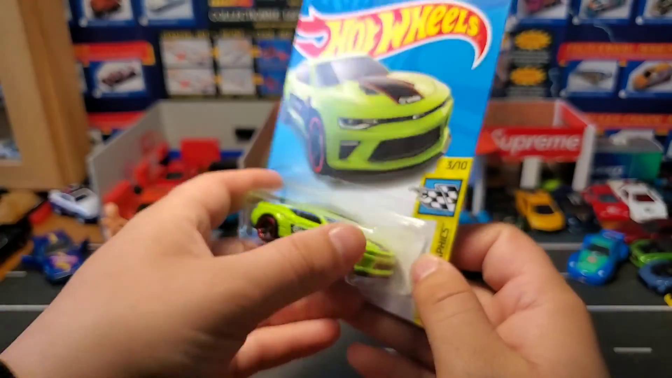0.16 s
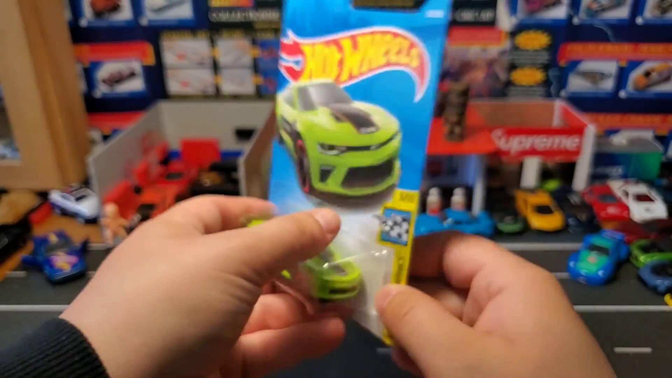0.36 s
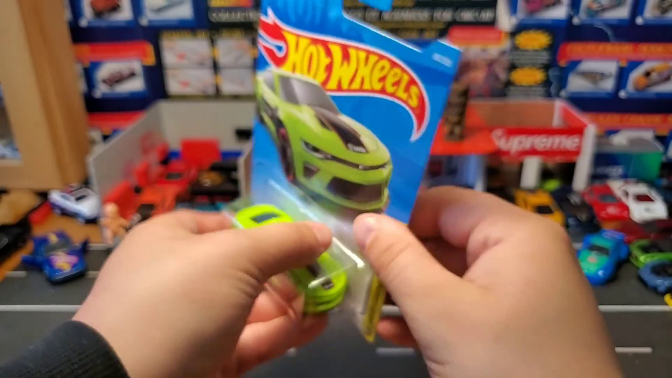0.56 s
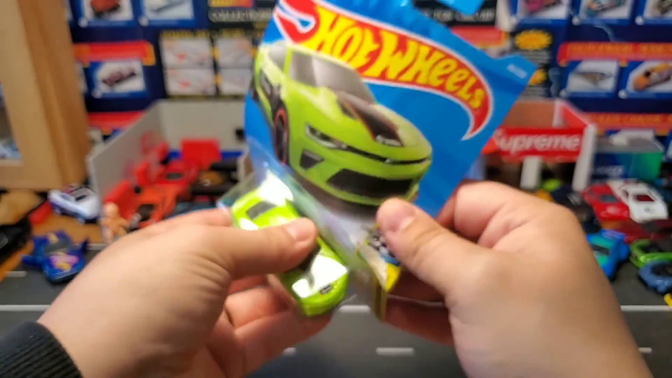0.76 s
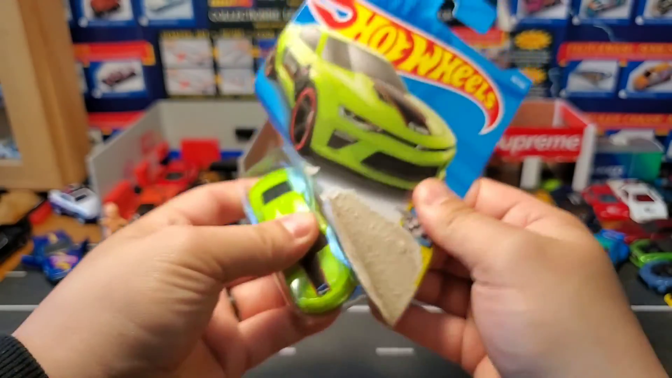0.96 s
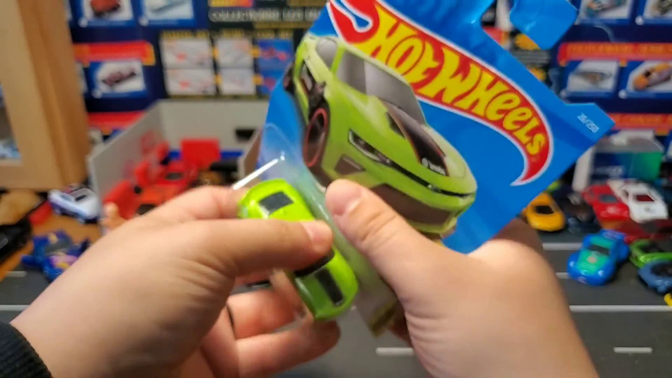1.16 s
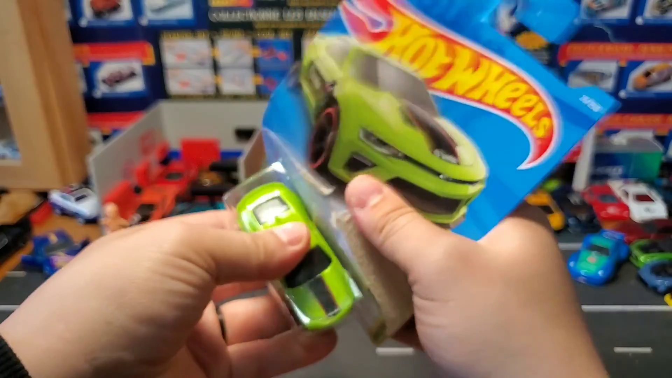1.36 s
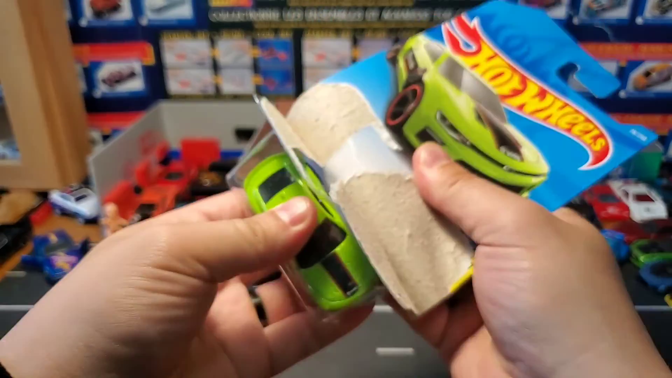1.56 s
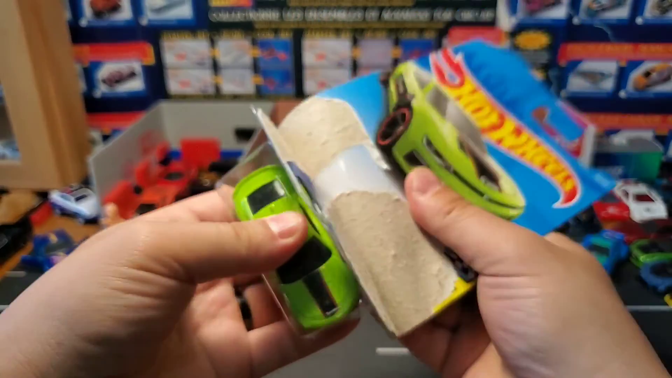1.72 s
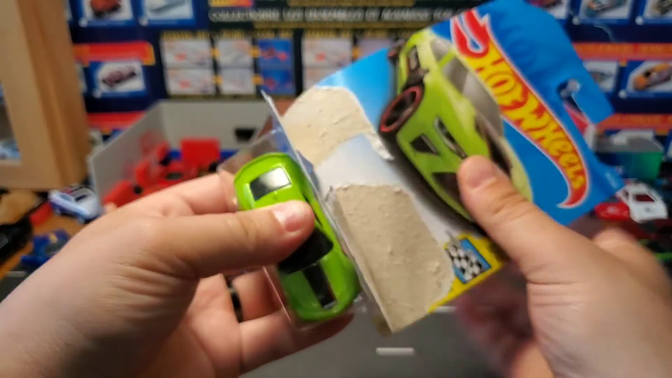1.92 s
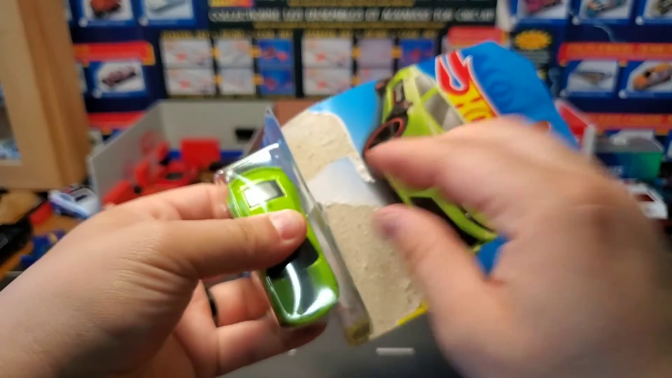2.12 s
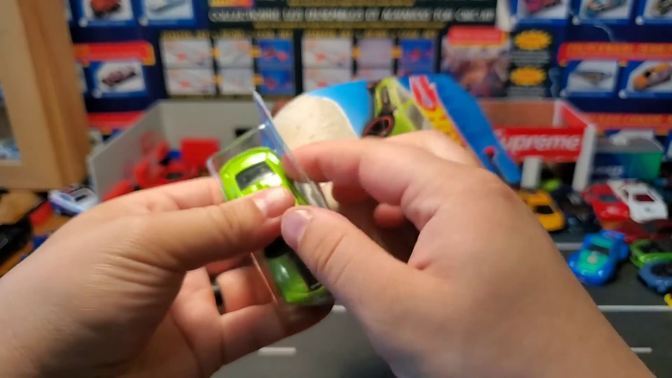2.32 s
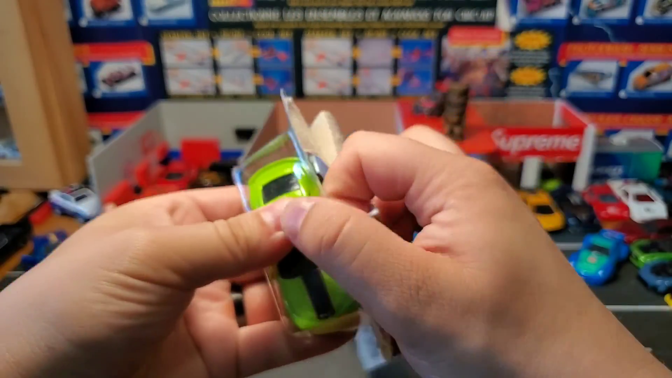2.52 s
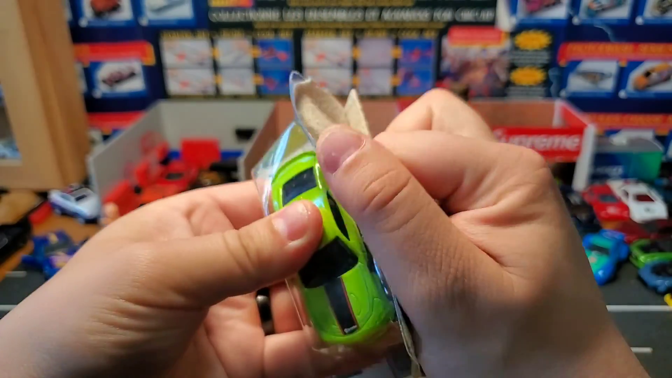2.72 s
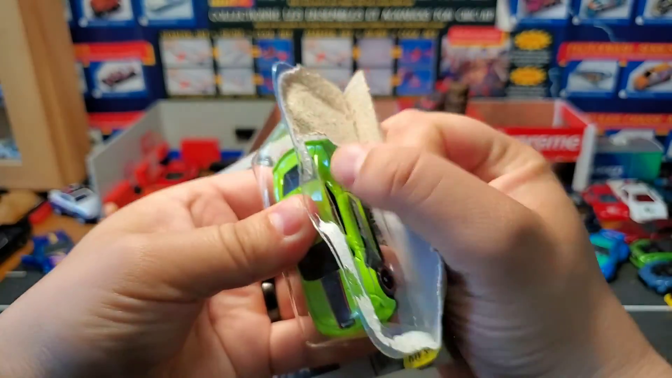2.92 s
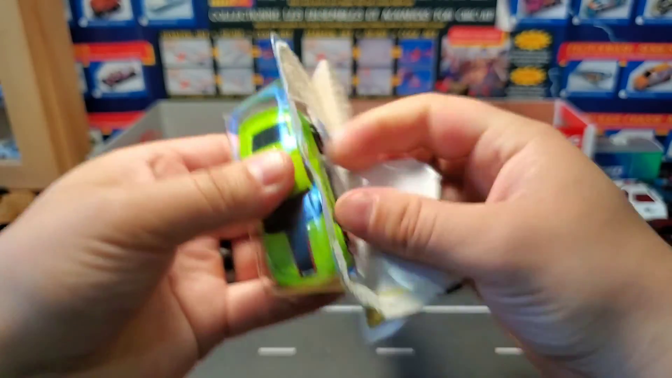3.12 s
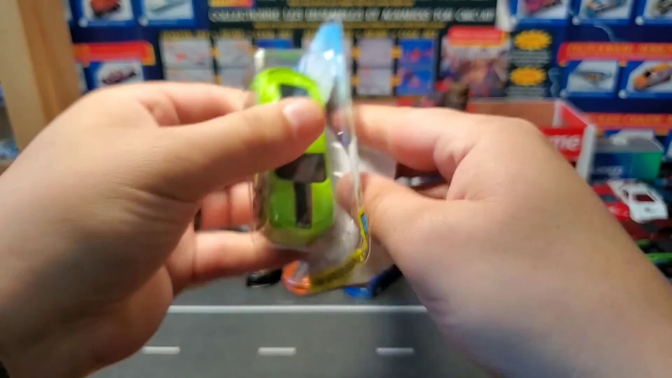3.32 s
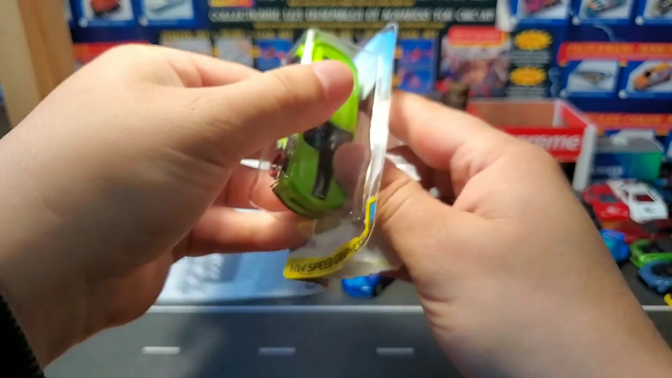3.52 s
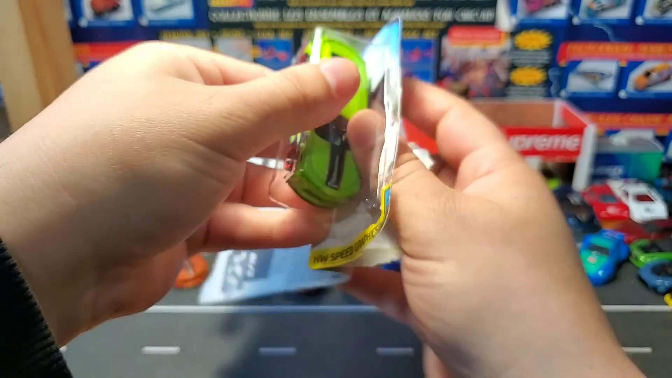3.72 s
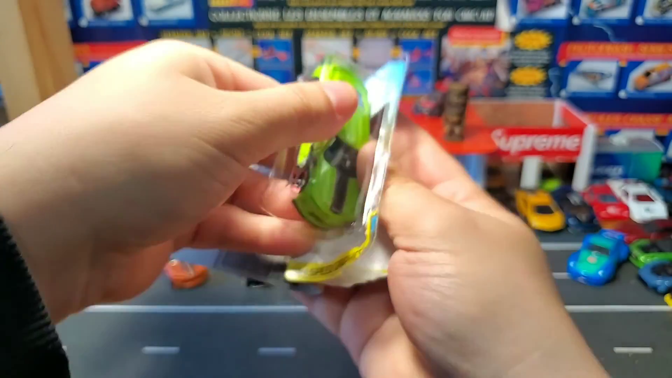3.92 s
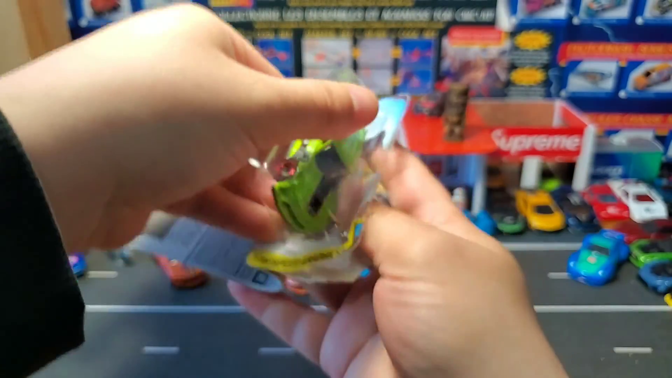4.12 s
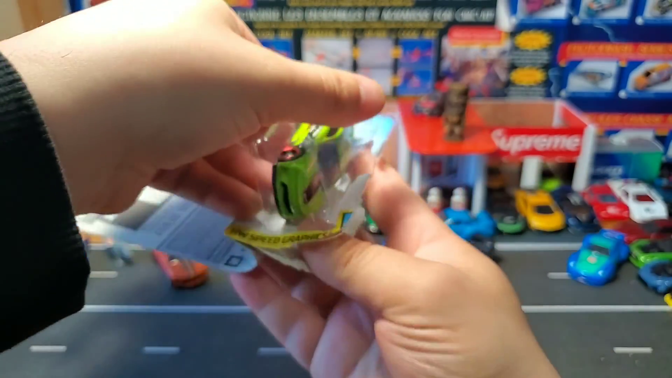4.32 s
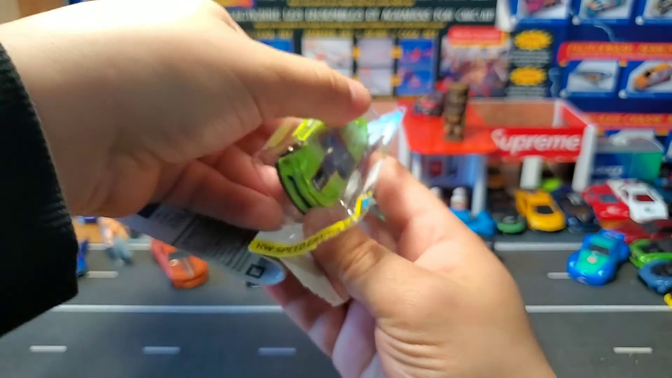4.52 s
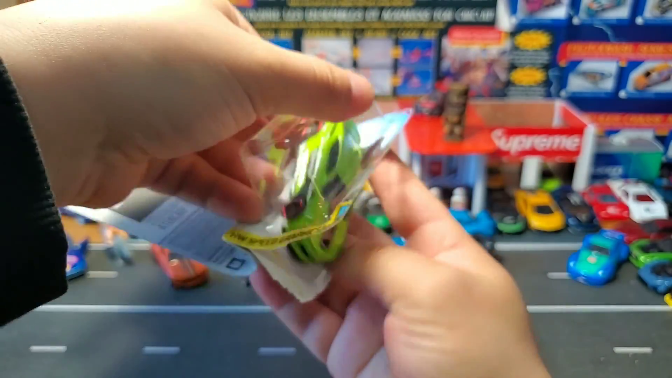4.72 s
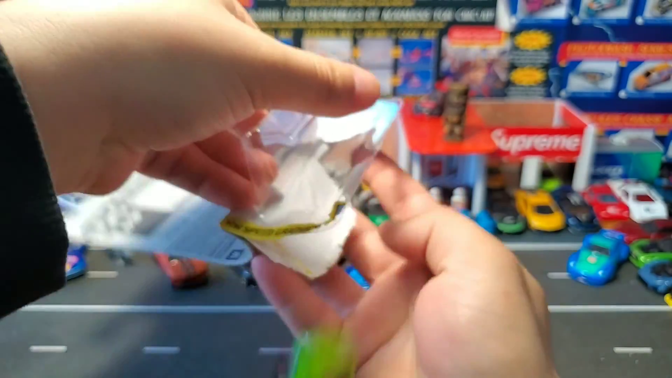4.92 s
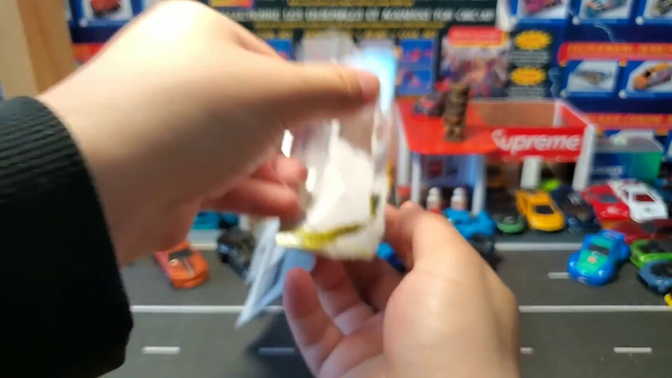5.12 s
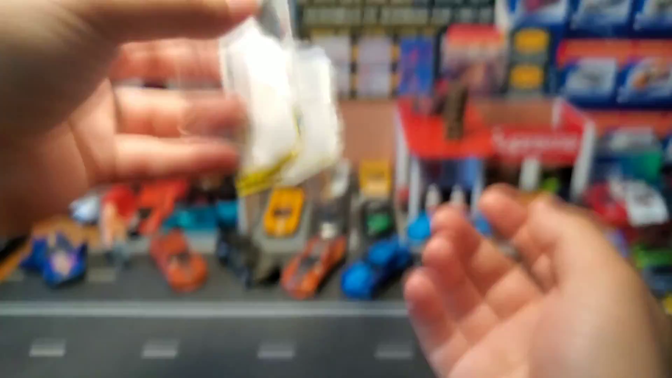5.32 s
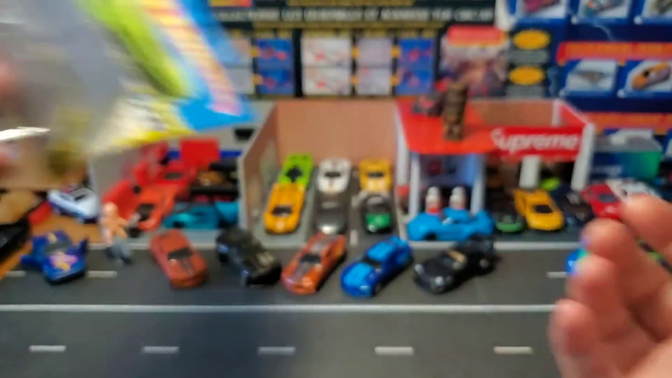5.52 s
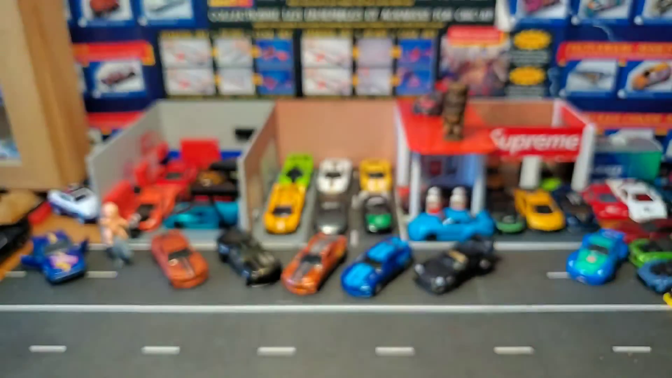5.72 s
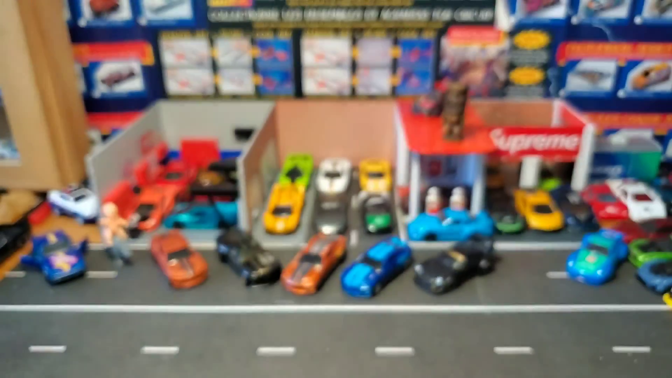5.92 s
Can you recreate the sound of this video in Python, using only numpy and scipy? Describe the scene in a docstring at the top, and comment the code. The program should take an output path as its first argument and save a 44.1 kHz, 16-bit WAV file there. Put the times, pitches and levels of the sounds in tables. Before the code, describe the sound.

Hands peel a plastic blister from its cardboard with sharp crackles and rips, then the pack and a small metal toy land on a table.

```python
"""Peeling open a blister pack

Close on a stereo pair in a small, quiet room, the hands a little to the right. The plastic shell snaps
and crinkles as it buckles; the card rustles under the fingers and rips fibre by fibre.
Around five seconds in, a metal toy clinks, then pack and toy land and set the table top ringing."""
import sys
import numpy as np
from scipy import signal
from scipy.fft import rfft, irfft
from scipy.io import wavfile

SR = 44100
rng = np.random.default_rng(int(sys.argv[2]) if len(sys.argv) > 2 else 0)


def store_wav(level_fs):
    """Save 16-bit WAV to argv[1]."""
    pcm = np.round(np.clip(np.atleast_2d(level_fs), -1, 1) * 32767)
    wavfile.write(sys.argv[1], SR, pcm.T.astype(np.int16))


N = 263012

# Room tone and microphone hiss: freq_hz, relative_db
AIR_SPECTRUM = [(18, -56.5), (30, -16.5), (79, 19.5), (109, -40), (486, -37), (1070, -26.5),
                (2060, -17.5), (2900, -53.5), (6550, -36.5), (16000, -32)]
# Fingers rubbing and holding the card: time_s, body_db, hiss_db, rumble_db
HANDLING = [(0.0, -91, -84, -61.5), (0.301, -64.5, -74.5, -63), (0.5, -56, -53, -56),
            (0.8, -55, -69, -62.5), (1.079, -57.5, -53.5, -68), (1.35, -59, -61, -55),
            (1.621, -60, -67, -64), (1.92, -58, -48.5, -68.5), (2.099, -89.5, -87, -71),
            (2.27, -75, -91, -63), (2.359, -51.5, -66, -60), (2.5, -48, -48.5, -62),
            (2.8, -45.5, -45.5, -55), (3.05, -53.5, -51.5, -70), (3.3, -50.5, -50.5, -54),
            (3.5, -56, -59.5, -63), (3.849, -51.5, -50.5, -62), (4.12, -55.5, -54, -66),
            (4.4, -62.5, -65, -65), (4.55, -55, -46, -68), (4.95, -49, -88, -56), (5.05, -58, -60, -61),
            (5.3, -53.5, -78, -46), (5.56, -66.5, -72, -58), (5.78, -72, -61.5, -62), (5.96, -52, -67, -43)]
# Hard pulls that rip the card: start_s, length_s, body_db, hiss_db, fizz_db, rumble_db
RIP_PULLS = [(0.13, .09, -49.5, -52.5, -53, -51), (0.505, 0.055, -54, -52.5, -45.5, -58),
             (0.835, .03, -42.5, -35, -37, -55), (0.897, 0.095, -38.5, -43, -38, -47.5),
             (1.236, .07, -41.5, -43, -51, -53), (1.385, 0.054, -35, -39, -44.5, -50.5),
             (1.455, 0.023, -34.5, -41.5, -42, -50), (1.488, 0.043, -30, -40.5, -37, -49.5),
             (1.624, .04, -55, -55, -47, -73), (1.96, 0.037, -36, -47, -44, -50),
             (2.548, .1, -41, -49, -41, -63), (2.72, .06, -41.5, -43, -40, -59),
             (2.857, 0.093, -39, -43, -45, -58), (3.077, .07, -43.5, -40, -35, -58),
             (3.851, .05, -50.5, -56, -57, -55), (4.718, .17, -42, -47.5, -44.5, -72),
             (5.326, .05, -39.5, -31.5, -44, -40)]
# Broad resonances of the card: centre_hz, width_hz, relative_db
CARD_MODES = [(480, 244, -1), (803, 330, 4), (1297, 610, 4), (1893, 270, 5), (2610, 860, -1)]
# Hiss of the fibres: freq_hz, relative_db
HISS_SPECTRUM = [(2500, -59.5), (3500, 2), (5000, 1.5), (6700, 2.5), (7600, -4), (9000, -23.5)]
# Their finest fizz: freq_hz, relative_db
FIZZ_SPECTRUM = [(6500, -39.5), (8000, 4.5), (11000, 3), (15000, 9), (16500, -7.5)]
# Rumble of the hands: freq_hz, relative_db
RUMBLE_SPECTRUM = [(30, -18), (60, 11), (110, 0.5), (200, -7.5), (400, -12), (700, -32)]
# The shell's louder snaps (top is the crack above 7 kHz, pan is left minus right):
# start_s, ring_db, pitch_hz, ring_ms, crack_db, crack_hz, top_db, thump_db, pan_db
SHELL_SNAPS = [(0.066, -71.5, 514, 2.1, -61, 3180, -69, -72, -6),
               (0.103, -45, 1210, 4.7, -52, 2870, -68, -57, -5),
               (0.142, -24, 1900, 5.9, -39.5, 3290, -51, -38, -7),
               (0.159, -22.5, 1180, 1.2, -41.5, 2570, -45, -41.5, -6),
               (0.199, -24, 1810, 2.4, -46, 2460, -37, -44, -5),
               (0.53, -32, 1440, 3.3, -50, 5700, -45.5, -53, -7),
               (0.606, -32, 840, 1.2, -42, 2720, -54, -43, -6.0),
               (0.627, -29, 874, 2.4, -43, 3300, -46, -50, -7),
               (0.687, -42, 822, 2.4, -37, 6670, -37.5, -57, -7),
               (0.707, -36, 1360, 2.1, -31, 6860, -31, -57, -8),
               (0.712, -19.5, 1500, 2.5, -33.5, 2400, -42.5, -49, -3.5),
               (0.723, -35, 2400, 2.9, -43, 4780, -28.5, -48.5, -2.5),
               (0.728, -36, 1480, 2.4, -39.5, 7000, -38, -56, -6),
               (0.749, -50, 1110, 2.4, -46, 6500, -43, -57, -18),
               (0.779, -34, 1090, 1.9, -68, 2770, -55, -54.5, -14),
               (0.805, -37.5, 1420, 2.4, -46.5, 6140, -47, -62, -7),
               (0.815, -34, 1370, 3.1, -39.5, 3600, -31, -51, -3.5),
               (0.856, -13, 2110, 3.4, -28.5, 3030, -11.5, -43.5, -4),
               (0.863, -19, 1380, 4.6, -22, 5340, -25.5, -50.5, -3.5),
               (0.907, -19, 1220, 4.4, -25, 6830, -24, -54, -3.5),
               (0.913, -29.5, 1100, 5.3, -28, 2700, -13.5, -42.5, -4.5),
               (0.933, -10.5, 1984, 2.6, -25, 3100, -27, -33, -4.5),
               (0.958, -15, 866, 2.1, -23, 3130, -29, -32.5, -4.5),
               (0.985, -22.5, 1570, 3.9, -31, 3870, -26.5, -33.5, -4),
               (1.092, -14, 1345, 2.2, -62, 2540, -49, -31.5, -8.5),
               (1.113, -32.5, 799, 2.7, -51, 4060, -39, -52.5, -2),
               (1.136, -34, 2030, 2.4, -55, 2500, -34, -55.5, -4),
               (1.163, 1, 1328, 4.4, -45, 3100, -31, -45.5, -7.0),
               (1.238, -18.5, 1910, 1.8, -14, 2330, -19, -47.5, -7.5),
               (1.366, -19, 1870, 2.1, -61, 3210, -55, -68, -3),
               (1.379, -14.5, 1400, 2.7, -28.5, 5800, -41, -43.5, -5),
               (1.393, -10, 1420, 2.4, -21.5, 2800, -18.5, -40, -6),
               (1.401, -12.5, 1280, 2.2, -20, 3043, -17.5, -34.5, -2.5),
               (1.47, -18.5, 854, 1.1, -36, 3220, -25.5, -51, -3.5),
               (1.485, -16.5, 1680, 3.1, -30.5, 2700, -18, -32, -5),
               (1.5, -16, 1385, 7.2, -27, 2590, -25, -30, -7),
               (1.516, -18.5, 1150, 5.5, -26.5, 2710, -21, -40, -3),
               (1.621, -30.5, 1400, 1.6, -48, 7100, -22.5, -50.5, -7),
               (1.636, -24, 1270, 1.9, -29.5, 5370, -18, -51.5, -6.5),
               (1.736, 0.5, 1440, 2.8, -17, 2700, -20.5, -55.5, -5.5),
               (1.758, -44.5, 1480, 2.4, -51, 2500, -31, -42.5, 0),
               (1.815, -17.5, 1431, 3.4, -34.5, 3130, -40.5, -34, -6),
               (1.832, -18.5, 1920, 4.8, -35.5, 2750, -29.5, -36, -3.5),
               (1.921, -15, 1305, 0.97, -25.5, 2600, -48, -35.5, -3.5),
               (1.972, 0.5, 1920, 2.8, -36, 2970, -18.5, -27, -4.5),
               (2.241, -34.5, 1167, 3, -80, 2870, -79, -42.5, -5.5),
               (2.29, -39, 800, 2.9, -48.5, 3070, -51, -37, -5),
               (2.312, -44, 802, 1.2, -43, 2800, -36.5, -43, -4),
               (2.378, -27, 1827, 1.8, -51.5, 2970, -50, -47, -3),
               (2.456, -12.5, 1970, 1.14, -31.5, 3900, -30, -52, -5.5),
               (2.497, -33.5, 1540, 2.9, -47, 6030, -34.5, -51, -2.5),
               (2.549, -24, 1505, 1.1, -39, 3480, -42, -56, -3),
               (2.596, -23.5, 1840, 1.6, -39.5, 4170, -32, -67, -2.5),
               (2.622, -24, 2090, 2.7, -36, 5856, -26.5, -60.5, -4.5),
               (2.654, -25.5, 2100, 2.2, -44, 2460, -42, -58, -3),
               (2.684, -20, 509, 2.2, -62, 3410, -48, -45, -3.5),
               (2.762, -15.5, 1190, 0.95, -21, 4700, -17, -51, -4.5),
               (2.782, -17.5, 1520, 1.4, -27.5, 2760, -31, -41, -4),
               (2.856, -21, 1280, 1.5, -33, 2660, -37, -58.5, -5.0),
               (2.87, -5.5, 1370, 1.1, -26, 2780, -19, -47, -4.5),
               (2.878, -11, 1400, 2.4, -25.5, 5320, -20, -39.5, -4),
               (2.892, -17, 1800, 2.4, -37, 3150, -22.5, -49, -5),
               (2.909, -13, 866, 4.5, -33, 2700, -22.5, -58, -4),
               (2.94, -4.5, 1750, 3.1, -29, 2720, -27, -67, -3),
               (2.975, -47, 1900, 1.6, -30.5, 6630, -19.5, -65, -0.5),
               (3.112, -25.5, 950, 1.8, -30, 4440, -28.5, -39, -4.5),
               (3.13, -20, 2260, 3.1, -35, 3470, -36, -39, -6),
               (3.144, -29, 640, 1.8, -36, 2780, -42, -45.5, -4),
               (3.22, -13.5, 1866, 2.1, -22.5, 6400, -20.5, -42, -2),
               (3.236, -18, 2020, 1.6, -49.5, 6710, -42, -45, -6),
               (3.288, -5, 1950, 4.9, -27, 2740, -20.5, -63, -3),
               (3.532, -25.5, 1550, 6.2, -33.5, 3830, -34, -51.5, -5),
               (3.553, -29.5, 1650, 5.1, -36, 5540, -36, -55, -6),
               (3.604, -21, 1724, 2.9, -34, 2770, -33, -49, -6.5),
               (3.615, -20.5, 1510, 2, -35.5, 4650, -38, -48, -5.5),
               (3.643, -41, 650, 2.6, -43, 6980, -39, -42, -2),
               (3.798, -37, 670, 3, -42.5, 2500, -47, -50, -5),
               (3.88, -29, 1480, 3, -41, 3160, -48, -55, -5),
               (3.898, -21, 650, 6.6, -52, 3000, -57, -25.5, -4),
               (3.948, -9, 1620, 2.2, -51, 2500, -48, -38, -6.5),
               (3.975, -14.5, 2100, 1.3, -16.5, 3000, -19.5, -44, -6.5),
               (4.175, -34, 2110, 2.7, -42.5, 3020, -53, -80, -6),
               (4.247, -28, 950, 2.6, -38, 3480, -38, -67, -4.5),
               (4.331, -33, 1980, 1.5, -48, 2590, -47, -54.5, -4),
               (4.526, -16.5, 1480, 2.1, -44, 2500, -41, -78.5, -7),
               (4.605, -42, 2250, 2.7, -52, 3480, -55.5, -66, 1),
               (4.674, -32, 1490, 2.7, -44, 2804, -60, -66, -6),
               (4.725, -24.5, 1520, 2.8, -43, 3100, -43.5, -72, -7),
               (4.762, -25, 999, 2.2, -37, 3160, -49, -72, -4.0),
               (4.884, -34, 1720, 4.8, -32.5, 4300, -31, -39.5, -7.5),
               (4.901, -21, 1440, 3.7, -20, 4230, -14, -55, -6),
               (4.965, -51, 2060, 5.2, -18.5, 6220, -19, -44, -6.5),
               (5.007, -38, 2400, 4.9, -25, 5300, -25.5, -56.5, -14),
               (5.013, -41.5, 2460, 2.4, -41, 3050, -34, -64.5, 0)]
# Modes of the metal toy: pitch_hz, level_db, t60_s
TOY_MODES = [(2867, 6, 0.021), (3480, -13, 0.06), (4470, -13.5, 0.096)]
# Blows to the toy: start_s, level_db
TOY_BLOWS = [(4.886, -44), (5.013, -22), (5.299, -12), (5.382, -17), (5.747, -27)]
# Pack and toy landing: start_s, ring_db, pitch_hz, ring_ms, crack_db, top_db, thump_db, room_db
LANDINGS = [(5.082, -6, 906, 9.2, -24.5, -18, -24.5, -5), (5.093, -13.5, 762, 3.6, -40, -44, -26.5, -5),
            (5.109, -5.5, 895, 2, -51.5, -56, -23.5, 2), (5.299, -11, 1830, 8, -16.5, -17.5, -36, -11),
            (5.306, -12, 630, 2.8, -35, -24, -55, -18), (5.316, -24, 345, 4.5, -31, -12, -38, -5.5),
            (5.347, -13, 470, 7, -25.5, -20, -53, -2), (5.381, -17.5, 1570, 8.8, -18, -11, -31, -9.5),
            (5.388, -14, 1120, 3.6, -18, -15.5, -25, -7.5), (5.395, -15, 1225, 6.8, -20, -48, -44, -6),
            (5.728, -22, 270, 5.3, -37.5, -25.5, -25, -17), (5.741, -24.5, 187, 6.5, -50, -32, -51, -8),
            (5.746, -36, 263, 4.8, -38, -24, -63, -10), (5.764, -31, 220, 4.7, -58, -51, -37, 2),
            (5.886, -19.5, 580, 11, -28, -24.5, -26, -3.5), (5.891, -17, 365, 7.9, -41, -36, -42, -13)]
# Modes of the table top: pitch_hz, relative_db, t60_s
TABLE_MODES = [(107, -6.5, 0.26), (268, -10, 0.17), (335, -1, 0.079)]
# Decay of the small room: freq_hz, t60_s
ROOM_DECAY = [(100, 0.097), (400, 0.23), (1500, 0.2), (5000, 0.32), (14000, 0.31)]
# Shadow of the hands on the left microphone: freq_hz, left_minus_right_db
HAND_SHADOW = [(100, -2), (700, -4), (1300, -7), (8000, -7), (15000, -6.5)]
# Overall tone, with softer treble above 7 kHz and a steep cut above 15 kHz: freq_hz, gain_db
OVERALL_TONE = [(40, -3), (70, -2.5), (6800, -0.5), (7700, -7.5), (9000, -8), (15000, -8.5), (15700, -19),
                (16600, -43)]

KNOCK_SAMPLES = 2000


def amp(db):
    return 10 ** (np.asarray(db) / 20)


def unit_rms(x):
    return x / np.sqrt(np.mean(x ** 2) + 1e-20)


def curve_at(points, hz):
    freq_hz, value = np.transpose(points)
    return np.interp(np.log(hz + 1), np.log(freq_hz + 1), value)


def equalise(x, spectrum):
    return irfft(rfft(x) * amp(curve_at(spectrum, np.fft.rfftfreq(N, 1 / SR))), N)


def coloured(x, spectrum):
    return unit_rms(equalise(x, spectrum))


def band(x, lo_hz, hi_hz):
    return signal.sosfilt(signal.butter(2, [lo_hz, hi_hz], "band", fs=SR, output="sos"), x)


def room_tone():
    """The quiet room and the microphones' own hiss, nearly alike on both sides."""
    mid, side = rng.standard_normal((2, N))
    return amp(-72.5) * coloured(np.array([mid + 0.23 * side, mid - 0.17 * side]), AIR_SPECTRUM)


def hand_effort(rise_s=0.013, fall_db_per_s=299.5):
    """Body, hiss, fizz and rumble in dB: steady handling plus rips that rise, hold and fade."""
    time_s, body_db, hiss_db, rumble_db = np.transpose(HANDLING)
    fizz_db = hiss_db + 4
    t = np.arange(0, N, 40) / SR
    power = amp([np.interp(t, time_s, db) for db in (body_db, hiss_db, fizz_db, rumble_db)]) ** 2
    for start_s, length_s, *peak_db in RIP_PULLS:
        rise = np.clip((t - start_s) / rise_s, 0, 1)
        fade = amp(-fall_db_per_s * np.maximum(t - start_s - length_s, 0))
        power += np.outer(amp(peak_db), rise * fade) ** 2
    return np.array([np.interp(np.arange(N) / SR, t, db) for db in 10 * np.log10(power)])


def grains(per_s, spread_db, rise_ms):
    """Fibres let go one by one: little noise bursts of unequal size."""
    sizes = amp(spread_db * np.minimum(rng.exponential(1, N), 4)) * (rng.random(N) < per_s / SR)
    age = np.arange(400) / SR * 1000 / rise_ms
    envelope = signal.oaconvolve(sizes, age * np.exp(1 - age))[:N]
    return unit_rms(envelope * rng.standard_normal(N))


def card_tearing(body_db, hiss_db, fizz_db):
    """A light touch rubs smoothly, force rips fibres; both ring the card's broad modes."""
    grit = np.clip((body_db + 60) / 24, .02, .97)
    rub = grains(per_s=5400, spread_db=8.5, rise_ms=1)
    rip = grains(per_s=350, spread_db=9.5, rise_ms=1)
    drive = np.sqrt(grit) * rip + np.sqrt(1 - grit) * rub
    body = sum(amp(db) * band(drive, hz - width / 2, hz + width / 2) for hz, width, db in CARD_MODES)
    fibres = 0.84 * drive + np.sqrt(grit) * grains(per_s=130, spread_db=-1.5, rise_ms=0.15)
    hiss = amp(hiss_db) * coloured(fibres, HISS_SPECTRUM)
    fizz = amp(fizz_db) * coloured(fibres, FIZZ_SPECTRUM)
    return amp(body_db) * unit_rms(body) + hiss + fizz


def hand_rumble(level_db):
    """Low, uneven rumble of hands working close to the microphones."""
    mid, side = (coloured(grains(per_s=120, spread_db=-3, rise_ms=5.1), RUMBLE_SPECTRUM)
                 for _ in range(2))
    return amp(level_db) * np.array([mid + 0.41 * side, mid - 0.47 * side])


def knock(voice, rise_ms, rattle, rattle_ms, crack_stretch, thump_ms, thump_hz, roughness):
    """A panel rings briefly, a crack on its start, a thump below. Returns stereo and room send."""
    ring_db, pitch_hz, ring_ms, crack_db, crack_hz, top_db, thump_db, pan_db = voice
    t_ms = np.arange(KNOCK_SAMPLES) / SR * 1000
    impulse, sides = 1. * (t_ms == 0), np.array([[pan_db], [-pan_db]])
    draws = rng.standard_normal((4, 3, KNOCK_SAMPLES))
    width = np.array([0.4, 0.54, 1.0, 0.32])[:, None, None]  # each side hears slightly different noise
    ring_noise, crack_noise, top_noise, thump_noise = draws[:, :1] + width * draws[:, 1:]

    grain = unit_rms(band(ring_noise, pitch_hz * 0.56, pitch_hz * 1.76))
    tone = np.sin(2 * np.pi * pitch_hz * t_ms / 1000) + roughness * grain
    tail = rattle * np.exp(-t_ms / rattle_ms)
    ring = tone * (1 - np.exp(-t_ms / rise_ms)) * (np.exp(-(t_ms / ring_ms) ** 2) + tail)
    ring = amp(ring_db) * ring / abs(ring).max()
    direct = ring * amp(sides / 2)
    # The room gets the ring plus a faint tone just above it; crack, top and thump go in as clicks.
    upper_tone = band(impulse, pitch_hz * 1.24, pitch_hz * 1.25)
    send = ring[0] + 0.14 * np.linalg.norm(ring[0]) * upper_tone / np.linalg.norm(upper_tone)

    sharp = (1 - np.exp(-t_ms / 0.43)) * (np.exp(-t_ms / (crack_stretch * ring_ms)) + 1.8 * tail)
    soft = (1 - np.exp(-t_ms / 1.6)) * np.exp(-t_ms / thump_ms)
    tick = 2.3 * np.roll(impulse, 30)  # the fold gives way at one instant
    parts = [(crack_noise * sharp + tick, crack_db, crack_hz * 0.59, crack_hz * 1.414, .68),
             (top_noise * sharp + tick, top_db, 7000, 17000, .9),
             (thump_noise * soft, thump_db, 60, thump_hz, .1)]
    for burst, level_db, lo_hz, hi_hz, pan_share in parts:
        part, click = band(burst, lo_hz, hi_hz), band(impulse, lo_hz, hi_hz)
        gain = amp(level_db) * np.sqrt(.006 * SR)  # level as rms over 6 ms
        direct += gain * part / np.linalg.norm(part[0]) * amp(pan_share * sides)
        send += gain * click / np.linalg.norm(click)
    return direct, send


def place_knocks(rows, **material):
    """Sets each knock between the microphones and sends its share to the room."""
    direct, send = np.zeros((2, N + 4000)), np.zeros(N + 4000)
    for start_s, *voice, room_db in rows:
        (left, right), to_walls = knock(voice, **material)
        at, pan_db = round(start_s * SR), voice[-1]
        lag = max(round(-pan_db * .9), 0)  # further right arrives later on the left
        direct[0, at + lag:at + lag + KNOCK_SAMPLES] += left
        direct[1, at:at + KNOCK_SAMPLES] += right
        send[at:at + KNOCK_SAMPLES] += amp(min(room_db, 2)) * to_walls
    return direct[:, :N], send[:N]


def shell_snaps(snaps):
    """The plastic shell buckles; weaker snaps are heard more through the room."""
    rows = [(*snap, -14 - 0.29 * max(snap[1], snap[4])) for snap in snaps]  # louder of ring and crack
    return place_knocks(rows, rise_ms=0.76, rattle=0.47, rattle_ms=5.7, crack_stretch=1.0,
                        thump_ms=13.7, thump_hz=587, roughness=0.54)


def crinkles(body_db, count=14, ring_ms=5.5):
    """Rows of small chance snaps, denser and louder the harder the card is worked, until it lands."""
    odds = np.cumsum(amp(body_db) * (np.arange(N) / SR < LANDINGS[0][0]))
    rows = []
    for when, size, pitch, bright, side in rng.random((count, 5)):
        at = np.searchsorted(odds, when * odds[-1])
        ring_db = body_db[at] + 11.5 + 2 * (2 * size - 1)
        crack_db, top_db, thump_db = ring_db - 8, ring_db + 4.5, ring_db - 33
        pitch_hz = 1150 * (2170 / 1150) ** pitch
        crack_hz = 2700 * (6800 / 2700) ** bright
        pan_db = -2 + 4.5 * (2 * side - 1)
        rows.append((at / SR, ring_db, pitch_hz, ring_ms, crack_db, crack_hz, top_db, thump_db, pan_db))
    return rows


def struck(modes, blows, rise_ms):
    """Blows ring a set of dying modes."""
    t, taps = np.arange(SR // 3) / SR, np.zeros(N)
    for start_s, level_db in blows:
        taps[round(start_s * SR)] = amp(level_db)
    ring = sum(amp(db - 60 * t / t60) * np.sin(2 * np.pi * hz * t) for hz, db, t60 in modes)
    return signal.oaconvolve(taps, ring * (1 - np.exp(-t * 1000 / rise_ms)))[:N]


def toy_clinks():
    """Each blow rings the metal toy's high, short modes."""
    return struck(TOY_MODES, TOY_BLOWS, rise_ms=1.2)


def landings(crack_hz=3100, pan_db=-1.5):
    """Pack and toy hit the table, always cracking in the same band, just right of centre."""
    rows = [(*row, crack_hz, top_db, thump_db, pan_db, room_db)
            for *row, top_db, thump_db, room_db in LANDINGS]
    return place_knocks(rows, rise_ms=0.4, rattle=0.31, rattle_ms=8.1, crack_stretch=0.63,
                        thump_ms=17.7, thump_hz=363, roughness=1.45)


def table_boom():
    """Each thump shakes the table top; its bending wave reaches the left side later."""
    thumps = [(start_s, thump_db) for start_s, *_, thump_db, room_db in LANDINGS]
    boom = struck(TABLE_MODES, thumps, rise_ms=1.5)
    return amp(-2) * np.array([np.roll(boom, 70), boom])


def stereo_pair(x, lag_ms=0.088):
    """The left microphone lies in the shadow of the hands and a little further off."""
    hz, spectrum = np.fft.rfftfreq(N, 1 / SR), rfft(x)
    shade = amp(curve_at(HAND_SHADOW, hz) / 2)
    delay = np.exp(-2j * np.pi * hz * lag_ms / 1000)
    return irfft([spectrum * shade * delay, spectrum / shade], N)


def small_room(x):
    """Dense reflections build up over the first echoes, then each band dies at its own speed."""
    size = SR // 2
    taps = rng.choice([-1., 1.], (2, size)) * (rng.random((2, size)) < .15)
    build_up = np.clip((np.arange(size) / SR - .004) / 0.01, 0, 1)
    hz, t, bands = signal.stft((taps + 0.052 * taps[::-1]) * build_up, SR, nperseg=256)
    decay_db = -60 * t / curve_at(ROOM_DECAY, hz)[:, None]
    shadow_db = np.outer([.4, -.4], curve_at(HAND_SHADOW, hz))[..., None]
    tail = signal.istft(bands * amp(decay_db + shadow_db), SR, nperseg=256)[1]
    return signal.fftconvolve(x[None], tail / np.linalg.norm(tail[0]), axes=1)[:, :N]


def scene():
    """Shell, card, toy and table close to the pair, with the room behind them."""
    body_db, hiss_db, fizz_db, rumble_db = hand_effort()
    shell, shell_send = shell_snaps(list(SHELL_SNAPS) + crinkles(body_db))
    landed, landed_send = landings()
    card_and_toy = card_tearing(body_db, hiss_db, fizz_db) + toy_clinks()
    direct = shell + landed + table_boom() + stereo_pair(card_and_toy) + hand_rumble(rumble_db)
    reflections = small_room(shell_send + amp(-5) * card_and_toy) + small_room(landed_send)
    return direct + reflections + room_tone()


def record(dry):
    """Softened treble, a soft overload on the loudest snaps, then a band limit at 16.7 kHz."""
    heard = equalise(dry, OVERALL_TONE)
    heard = heard / (1 + abs(heard) ** 8) ** (1 / 8)
    lowpass = signal.firwin(1023, 16700, window=("kaiser", 11), fs=SR)
    return signal.oaconvolve(heard, lowpass[None], "same")


dry = scene()
out = record(dry)
store_wav(out)
```